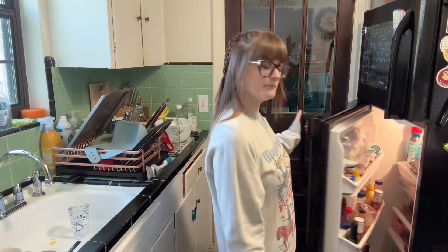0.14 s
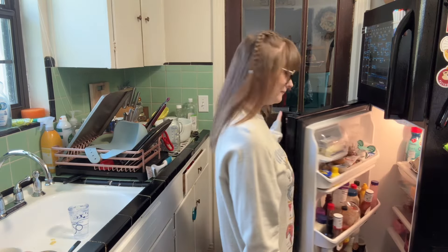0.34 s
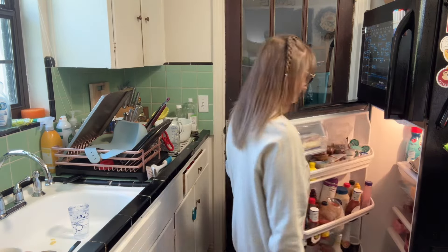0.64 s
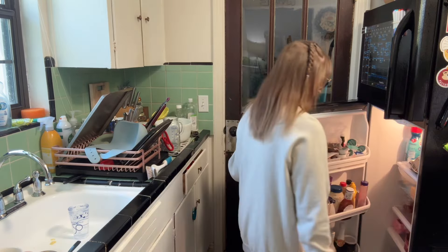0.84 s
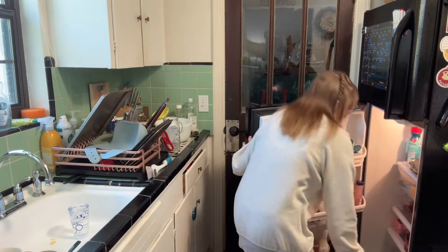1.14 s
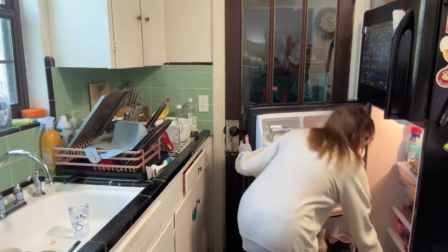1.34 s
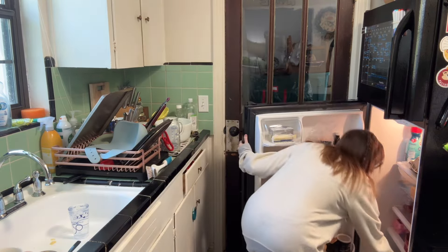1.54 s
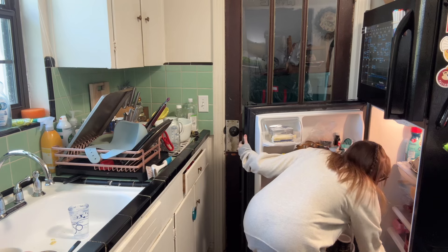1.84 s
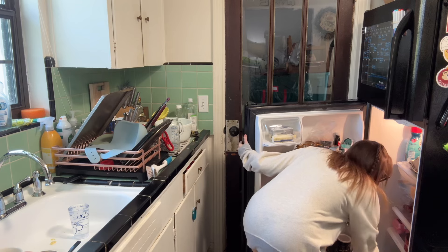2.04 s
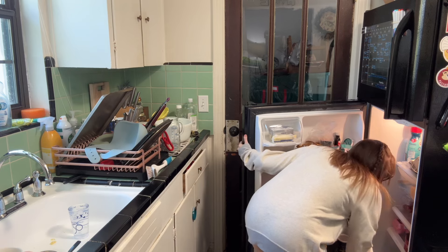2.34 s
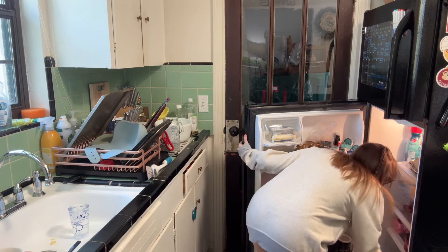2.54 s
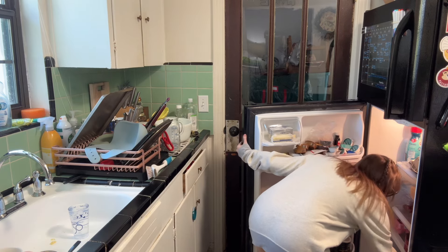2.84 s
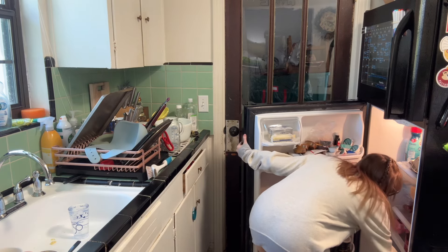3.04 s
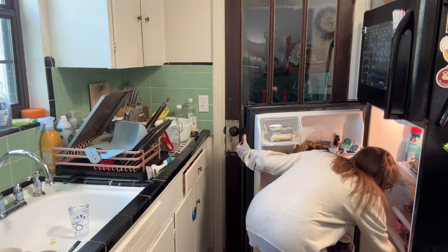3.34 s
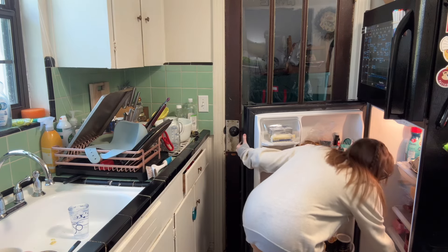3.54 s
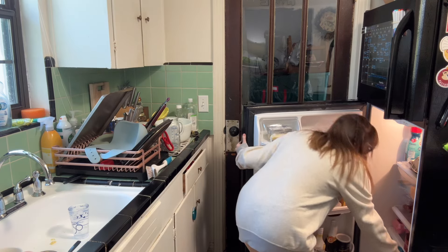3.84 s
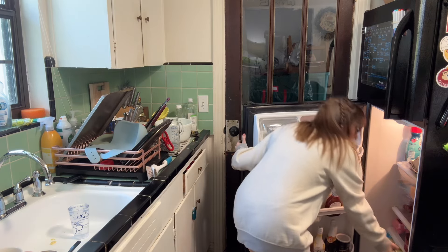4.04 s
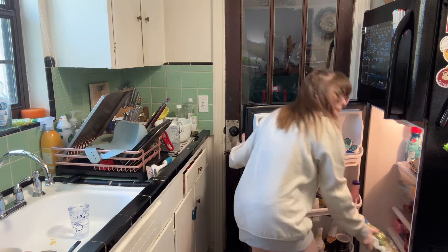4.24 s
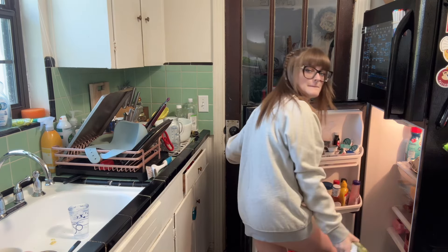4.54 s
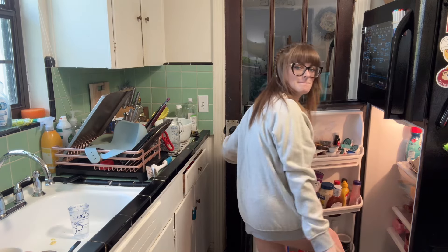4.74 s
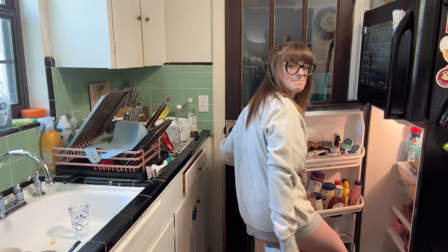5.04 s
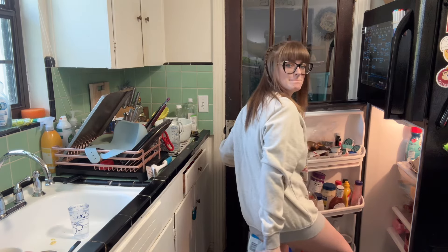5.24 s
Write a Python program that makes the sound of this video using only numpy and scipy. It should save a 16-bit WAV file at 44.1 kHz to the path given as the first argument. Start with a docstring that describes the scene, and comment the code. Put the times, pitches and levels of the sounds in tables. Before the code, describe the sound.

A refrigerator is heard from across a small kitchen, over a low rumble and a faint appliance whine. In the first 0.6 seconds bottles clink lightly as the door swings, and at about 0.75 seconds the door rack clacks and rattles. Sleeves brush softly. From 1.5 to 1.8 seconds hard plastic containers knock loudly on the shelves, with low thumps from the cabinet walls. A drawer slides out around 1.9 to 2.4 seconds, with further knocks. A thin plastic bag starts rustling with it and crinkles most from 2.8 to 4 seconds, while a container is dragged and a sharp knock lands at 3.5 seconds. After a quieter moment of cloth brushing, the drawer rumbles back in from about 4.9 seconds to the end, with a few softer knocks.

```python
"""A refrigerator in a small kitchen, heard across the room over low rumble and a faint whine.
The door swings: bottles clink in its rack, sleeves brush, and the rack clacks as the door stops.
Plastic containers knock on the shelves and set them ringing; soft bumps thump the cabinet walls.
A drawer sticks and slips out on its runners, a bag buckles and crinkles, a container is dragged.
Last, the drawer is pushed back with a few more knocks."""
import sys
import numpy as np
from scipy import signal
from scipy.fft import rfft, irfft, next_fast_len
from scipy.io import wavfile

SR = 44100
rng = np.random.default_rng(int(sys.argv[2]) if len(sys.argv) > 2 else 0)


def wav_record(signal):
    """Record a signal, one row per channel, as 16-bit PCM in the file named by sys.argv[1]."""
    frames = np.transpose(np.atleast_2d(signal))
    bounded = np.clip(frames, -1, 1)
    # unit amplitude maps onto the largest positive 16-bit level
    quanta = np.round(bounded * 32767).astype(np.int16)
    wavfile.write(sys.argv[1], SR, quanta)


N = 238253
TIME_S = np.arange(N) / SR
BAND_EDGES_HZ = np.geomspace(18, 18000, 21)

# room noise (frequency [Hz], density [dB])
AIR_SPECTRUM = [(12, -27), (20, 6), (40, -1.5), (91, -18.5), (120, -14), (216, -15.5), (255, -19),
                (293, -22), (527, -18.5), (976, -25.5), (2200, -35), (2460, -35.5), (16000, -54.5)]
# appliance whine (frequency [Hz], level [dB])
WHINE_TONES = [(673, -70), (1168, -71.5)]

# bottle contacts (time [s], clink [dB], treble [dB])
CLINKS = [(0.183, -46.5, -51), (0.355, -43, -47), (0.572, -54.5, -75), (1.421, -46.5, -57.5)]
# bottle resonances (frequency [Hz], gain [dB], T60 [s])
BOTTLE_MODES = [(560, -2, 0.23), (756, -9.5, 0.32), (1190, -22, 0.16), (1600, -3.5, .1), (1690, -12, 0.16),
                (2460, -11.5, 0.24), (2460, -15.5, 0.39), (2830, -27, 0.11), (3480, -13, 0.13),
                (7440, -12, 0.18), (7800, -1.5, .15), (8080, -13, .12), (8040, -2, .15), (8740, -12, .08),
                (9530, 3.5, .06), (10460, -2.5, 0.067)]
# glass chatter between the modes (frequency [Hz], gain [dB])
GLASS_SPECTRUM = [(60, -40), (400, -17), (900, -12.5), (2000, -4), (3500, -8), (5200, -23.5), (8000, 3),
                  (10000, -18), (13000, -30)]

# sleeve brushes (time [s], hold [s], level [dB])
BRUSHES = [(.29, 0.022, -61.5), (.94, 0.133, -62), (1.195, 0.012, -43.5), (1.36, 0.17, -61.5),
           (1.64, 0.0052, -51), (4.02, 0.34, -58), (4.18, 0.024, -62), (4.36, 0.27, -64.5),
           (4.61, 0.018, -53.5)]
# cloth hiss (frequency [Hz], density [dB])
SLEEVE_SPECTRUM = [(100, -8), (700, -6.5), (2000, -3), (6000, -3.5), (9000, -6), (15000, -17)]

# door stop and rebound (time [s], clack [dB], treble [dB])
DOOR_STOPS = [(.7428, -20, -34.5), (.753, -24, -34)]
# rack resonances (frequency [Hz], gain [dB], T60 [s])
RACK_MODES = [(790, -13, 0.19), (1106, -10, 0.11), (1285, -5.5, 0.058), (1596, -17, 0.16),
              (1820, -13, 0.18), (2127, -4.5, 0.073), (2630, -10.5, 0.12), (2865, -9, 0.057),
              (3950, -12.5, 0.091)]
# rack rattle between the modes (frequency [Hz], gain [dB])
RACK_SPECTRUM = [(60, -54), (450, -20), (900, -27), (2000, -7), (5000, -16.5), (8500, 1), (14000, -21)]

# single creases snapping (time [s], strength [dB], sharpness [dB])
CREASES = [(1.0201, -44.5, 1), (2.145, -18, -3), (2.697, -23, 12), (2.826, -22, 12), (2.867, -19, 5),
           (2.9436, -10.5, -5.5), (3.022, -18, 8), (3.0684, -24.5, 15), (3.1089, -11.5, -8),
           (3.1543, -14.5, 2.5), (3.1875, -22.5, 2), (3.2293, -22, -0.5), (3.242, -17, -8),
           (3.309, -16.5, -5), (3.4307, -17.5, 5), (3.594, -21, 0), (3.66, -29, 17), (3.8419, -16, -0.5),
           (3.918, -20, -1), (4.0084, -27, 2), (4.034, -28.5, 8), (4.2853, -33, -0.5), (4.5313, -34.5, -14),
           (4.582, -31, -16), (4.6076, -30, -16)]
# crease snap (frequency [Hz], gain [dB])
CREASE_SPECTRUM = [(100, -34.5), (400, -12.5), (1000, -12), (2200, -8.5), (4000, -16), (8000, -9),
                   (11000, -16), (15000, -22.5)]
# bag dragged out, then lifted free; a list per move (time [s], level [dB])
BAG_MOVES = [
    [(1.92, -43), (2.284, -44), (2.442, -48), (2.57, -54.5)],
    [(2.76, -35.5), (2.832, -35), (2.99, -35), (3.328, -32), (3.442, -35), (3.5, -30), (3.64, -42)],
]
# bag squeezes (time [s], hold [s], level [dB])
SQUEEZES = [(1.89, 0.066, -46), (2.08, 0.012, -39), (2.15, 0.013, -32.5), (2.245, 0.0091, -37),
            (2.79, .02, -36.5), (3.29, 0.011, -36), (3.37, 0.032, -29), (3.829, 0.006, -40),
            (3.935, .008, -47)]
# bag crinkle (frequency [Hz], density [dB])
BAG_SPECTRUM = [(71, -33), (120, -17.5), (204, 0.5), (321, -4), (378, -19), (684, 4.5), (839, -7.5),
                (911, 3.5), (1210, -13), (1320, -5.5), (2430, -8), (8480, -5.5), (16000, -20.5)]

# container knocks (time [s], strength [dB], contact [ms], cabinet thud [dB], hollow drawer [dB])
KNOCKS = [(1.547, -25.5, 0.33, -17, -34), (1.7, -23.5, 0.083, -24, -31.5), (1.7391, -11, 0.042, -18, -15),
          (1.7584, -9.5, 0.091, -14.5, -14), (1.8255, -26, 0.28, -35, -18),
          (2.3482, -16.5, 0.22, -24, -19.5), (2.3652, -19, 0.078, -31, -25.5),
          (2.3948, -26.5, 2.8, -27, -27), (2.6405, -26, 0.26, -33, -19.5), (3.482, -9, 0.1, -18, -11.5),
          (3.7387, -34, 0.72, -40.5, -28), (3.845, -39.5, 0.77, -41.5, -31.5),
          (4.8571, -27.5, 0.73, -41, -27.5), (4.9257, -24, 0.53, -33, -21), (5.1594, -32, 0.38, -42, -23),
          (5.1855, -49, .9, -38, -30)]
# cabinet, drawer and shelf resonances (frequency [Hz], gain [dB], T60 [s])
SHELF_MODES = [(82.9, -2.5, 0.32), (105.6, 7.5, 0.098), (117, -2, 0.3), (181.3, -15.5, 0.65),
               (210.2, -3, 0.33), (287.4, 0.5, 0.085), (340.6, -13.5, 0.16), (396, -20, 0.11),
               (424.2, -11, 0.21), (496.3, -12.5, 0.13), (536, -17.5, 0.67), (638, -11, 0.21),
               (676.5, -13.5, 0.15), (804, -12.5, 0.12), (900, -9, 0.15), (1085, -17.5, 0.29),
               (1303, -15, 0.16), (1554, -18, 0.064), (1891, -12.5, 0.1), (2320, -18.5, 0.058),
               (2696, -20, 0.096), (3530, -16, 0.15), (3840, -19.5, 0.17), (4520, -31, 0.05),
               (6160, -9.5, 0.088), (9300, -24.5, 0.057)]
# their dense finer modes (frequency [Hz], gain [dB])
PLASTIC_SPECTRUM = [(40, -27.5), (80, -28.5), (160, -28), (250, -4.5), (420, -14.5), (800, -4.5),
                    (2000, -10.5), (5000, -4), (8000, 2), (11000, -6), (15000, -8.5)]
# decay of the finer modes (frequency [Hz], T60 [s])
PLASTIC_T60 = [(80, 0.17), (400, 0.27), (1500, 0.15), (5000, 0.068), (14000, 0.041)]

# soft bumps on the cabinet wall (time [s], level [dB])
BUMPS = [(1.55, -11.5), (1.787, -14), (1.829, -21.5), (4.637, -34), (4.665, -38), (4.934, -28.5),
         (5.191, -29.5)]
# insulated wall resonances (frequency [Hz], gain [dB], T60 [s])
WALL_MODES = [(72, -6, 0.26), (129, -1.5, .11), (165, -1.5, .1)]

# drawer pulled out (time [s], rumble [dB], hiss [dB])
DRAWER_PULL = [(1.92, -46, -37), (2.032, -36, -43), (2.17, -35.5, -36), (2.33, -38, -49)]
# drawer pushed back (time [s], rumble [dB], hiss [dB])
DRAWER_PUSH = [(4.855, -34, -66), (4.937, -28, -52.5), (5.115, -41, -45), (5.149, -37, -38.5),
               (5.187, -27, -45.5), (5.219, -30.5, -47.5), (5.38, -33.5, -48)]
# runner resonances (frequency [Hz], width [Hz], gain [dB])
RUNNER_MODES = [(79.6, 14, 3), (134, 18, -6), (286, 90, -10), (506, 140, -16), (745, 130, -15.5),
                (1250, 22, -13.5)]
# runner hiss (frequency [Hz], density [dB])
RUNNER_SPECTRUM = [(290, -39), (500, -5), (698, 3), (761, -13.5), (1080, -1.5), (1930, -8.5), (4150, -4.5),
                   (9220, -17), (16000, -33)]

# container dragged over the drawer floor (time [s], level [dB])
DRAG = [(2.78, -33), (3.436, -35), (3.66, -43.5), (4.02, -51)]
# its resonances (frequency [Hz], width [Hz], gain [dB])
DRAG_MODES = [(100, 58, 1), (198, 38, 3), (283, 83, -2), (615, 65, -11.5), (880, 77, -5)]

# room decay (frequency [Hz], T60 [s])
KITCHEN_T60 = [(80, 0.7), (500, 0.28), (2500, 0.29), (8000, 0.29), (15000, 0.26)]

SLIDE_RISE_S, SLIDE_FALL_S = 0.044, 0.091   # per 20 dB


def from_db(db):
    """Decibels to gain."""
    return 10 ** (np.asarray(db) / 20)


def unit_rms(x):
    """Scale to unit rms."""
    return x / np.sqrt(np.mean(x ** 2) + 1e-20)


def at_hz(points, hz):
    """Interpolate (frequency [Hz], value) points over log frequency."""
    freqs_hz, values = np.transpose(points)
    return np.interp(np.log(hz), np.log(freqs_hz), values)


def butter(x, edges_hz, kind):
    """Butterworth filter, 12 dB per octave."""
    return signal.sosfilt(signal.butter(2, edges_hz, kind, fs=SR, output="sos"), x)


def drift(rate_hz):
    """Random wander through unit-variance knots."""
    knots = rng.standard_normal(4000)
    return np.interp(TIME_S * rate_hz, np.arange(len(knots)), knots)


def noise_bands(size):
    """Unit-rms half-octave noise bands: (centre [Hz], samples)."""
    white = rng.standard_normal((2, size + SR // 4))
    for k, (low_hz, high_hz) in enumerate(zip(BAND_EDGES_HZ, BAND_EDGES_HZ[1:])):
        band = butter(white[k % 2], [low_hz, high_hz], "band")
        yield np.sqrt(low_hz * high_hz), unit_rms(band[-size:])


def coloured(x, spectrum):
    """Apply a spectrum; unit rms."""
    size = next_fast_len(N)
    hz = np.maximum(np.fft.rfftfreq(size, 1 / SR), 1)
    shaped = rfft(x, size) * from_db(at_hz(spectrum, hz))
    return unit_rms(irfft(shaped, size)[:N])


def blows(times_s, levels_db):
    """One click per contact."""
    clicks = np.zeros(N)
    clicks[np.round(np.asarray(times_s) * SR).astype(int)] = from_db(levels_db)
    return clicks


def force_db(force, hz):
    """Each blow's level at one frequency; force is (frequency [Hz], level per blow [dB])."""
    anchors_hz, levels_db = zip(*force)
    return np.array([np.interp(np.log(hz), np.log(anchors_hz), row) for row in np.transpose(levels_db)])


def ring(clicks, hz, t60_s):
    """One damped mode: a unit click starts a unit sine, no DC."""
    radius, angle = from_db(-60 / (t60_s * SR)), 2 * np.pi * hz / SR
    return signal.lfilter([.5, 0, -.5], [1, -2 * radius * np.cos(angle), radius ** 2], clicks + 1e-18)


def modal(times_s, force, modes, scatter_db):
    """Clear modes swell over about a cycle; scatter mimics a varying strike point."""
    scatter = rng.standard_normal((len(times_s), len(modes)))
    out = 0
    for k, (hz, db, t60_s) in enumerate(modes):
        clicks = blows(times_s, force_db(force, hz) + db + scatter_db * scatter[:, k])
        swell = signal.iirpeak(hz, Q=3.6, fs=SR)
        out = out - signal.lfilter(*swell, ring(clicks, hz, t60_s))
    return out


def clatter(times_s, force, spectrum, t60s, rise_s, scatter_db=2.87):
    """Dense modes as noise bands, charged unevenly by each blow; t60s is (frequency [Hz], T60 [s])."""
    scatter = rng.standard_normal((len(times_s), len(BAND_EDGES_HZ)))
    rise_pole = np.exp(-1 / (rise_s * SR))
    out = 0
    for k, (hz, band) in enumerate(noise_bands(N)):
        levels_db = force_db(force, hz) + at_hz(spectrum, hz) + scatter_db * scatter[:, k]
        energy_pole = from_db(-120 / (at_hz(t60s, hz) * SR))
        energy = signal.lfilter([1], [1, -energy_pole], blows(times_s, levels_db) ** 2 + 1e-18)
        out = out + band * signal.lfilter([1 - rise_pole], [1, -rise_pole], np.sqrt(energy))
    return out


def tick(times_s, levels_db, band_hz):
    """Sharp onset of each contact."""
    return butter(blows(times_s, levels_db), band_hz, "band")


def grains(per_s, spread_db):
    """Random tiny slips: most weak, a few strong."""
    sizes = from_db(spread_db * np.minimum(rng.exponential(1, N), 4))
    signs = rng.choice([-1, 1], N)
    return sizes * signs * (rng.random(N) < per_s / SR)


def stroke(times_s, levels_db, rise_s, fall_s):
    """Gain of one movement; rise and fall times are per 20 dB."""
    before = np.maximum(times_s[0] - TIME_S, 0) / rise_s
    after = np.maximum(TIME_S - times_s[-1], 0) / fall_s
    return from_db(np.interp(TIME_S, times_s, levels_db) - 20 * np.minimum(before + after, 10))


def rubs(rows):
    """Gain of brief rubs that swell and fade alike."""
    return sum(stroke([start_s, start_s + hold_s], [db, db], rise_s=0.015, fall_s=0.088)
               for start_s, hold_s, db in rows)


def stick_slip(modes, slips_per_s, spread_db, catch_db):
    """Friction catches and lets go, shaking a body's resonances; unit rms."""
    slips = grains(slips_per_s, spread_db)
    body = sum(from_db(db) * signal.lfilter(*signal.iirpeak(hz, hz / width_hz, fs=SR), slips)
               for hz, width_hz, db in modes)
    catching = from_db(catch_db * drift(rate_hz=35))
    return unit_rms(butter(body * catching, edges_hz=29, kind="high"))


def room_tone():
    """Low rumble, faint hiss and a wavering appliance whine."""
    whine = sum(from_db(db) * np.sqrt(2) * np.sin(2 * np.pi * hz * TIME_S) for hz, db in WHINE_TONES)
    waver = from_db(2.5 * drift(rate_hz=5))
    return from_db(-47.5) * coloured(rng.standard_normal(N), AIR_SPECTRUM) + whine * waver


def bottles():
    """Glass strikes glass as the door swings."""
    times_s, clink_db, treble_db = np.transpose(CLINKS)
    force = [(4500, clink_db), (7500, treble_db)]
    chatter = clatter(times_s, force, GLASS_SPECTRUM, [(1000, 0.17), (9000, 0.041)], rise_s=0.00028)
    ringing = modal(times_s, force, BOTTLE_MODES, scatter_db=1.5)
    contact = tick(times_s, clink_db, band_hz=(1183, 8050))
    return from_db(-4.5) * ringing + from_db(1.5) * chatter + contact


def sleeves():
    """Cloth rubs on door and body: a soft, fine-grained hiss."""
    slips = grains(per_s=15000, spread_db=2.5) * from_db(2.6 * drift(rate_hz=60))
    return rubs(BRUSHES) * coloured(slips, SLEEVE_SPECTRUM)


def door():
    """The loaded plastic rack clacks as the door stops; its bottles jostle on."""
    times_s, clack_db, treble_db = np.transpose(DOOR_STOPS)
    force = [(4500, clack_db), (7500, treble_db)]
    clack = clatter(times_s, force, RACK_SPECTRUM, [(1000, 0.076), (9000, 0.067)], rise_s=0.0009)
    jostle_t60s = [(1000, 0.2), (2500, 0.18), (9000, 0.079)]
    jostle = clatter(times_s, force, RACK_SPECTRUM, jostle_t60s, rise_s=0.016)
    jostle *= from_db(1.9 * drift(rate_hz=140))
    ringing = modal(times_s, force, RACK_MODES, scatter_db=0)
    return from_db(-3) * (ringing + clack) + from_db(-18) * jostle


def bag_creases():
    """Single creases snap: strong ones sharp, weak ones papery."""
    times_s, snap_db, sharp_db = np.transpose(CREASES)
    bright_db = 3.9 + 1.244 * snap_db + 0.35 * sharp_db
    top_db = 20 + 2.08 * snap_db + sharp_db
    force = [(1800, snap_db - 9.5), (3500, snap_db), (8000, bright_db), (12500, top_db)]
    snaps = clatter(times_s, force, CREASE_SPECTRUM, [(500, 0.046), (9000, 0.053)], rise_s=0.00056)
    return from_db(-1) * snaps + tick(times_s, top_db - 14, band_hz=(2500, 14000))


def knock_forces():
    """Each knock and its softer rebound; longer contact drives less treble."""
    rebound_offset = [0.029, -6, 0.82, -12, -6]   # columns as in KNOCKS
    first = np.array(KNOCKS)
    times_s, strength_db, contact_ms, thud_db, hollow_db = np.vstack([first, first + rebound_offset]).T
    body = [(215, thud_db), (275, hollow_db), (380, hollow_db), (560, strength_db), (1100, strength_db)]
    hard_db = strength_db + 6.5   # treble of a perfectly hard contact
    treble = [(hz, hard_db - 20 * np.log10(1 + (hz * contact_ms / 1000) ** 2))
              for hz in (2600, 8000, 14000)]
    return times_s, body + treble


def containers():
    """Hard plastic strikes the shelves: bright crack over the hollow cabinet."""
    times_s, force = knock_forces()
    fine_modes = clatter(times_s, force, PLASTIC_SPECTRUM, PLASTIC_T60, rise_s=0.0037)
    contact = tick(times_s, force_db(force, hz=2610) + 7.5, band_hz=(600, 8900))
    buzz = from_db(0.77 * drift(rate_hz=330))   # loose walls chatter
    ringing = modal(times_s, force, SHELF_MODES, scatter_db=2)
    body = from_db(-1) * ringing + from_db(-0.5) * fine_modes * buzz
    return butter(body, edges_hz=25, kind="high") + contact


def cabinet():
    """Soft bumps drive only the walls' lowest, well-damped modes."""
    pushes = blows(*np.transpose(BUMPS))
    thump = sum(from_db(db) * ring(pushes, hz, t60_s) for hz, db, t60_s in WALL_MODES)
    return butter(thump, edges_hz=235, kind="low")


def bag_crinkle():
    """Thin plastic, moved and squeezed, buckles in clumps of tiny snaps."""
    moves = sum(stroke(*np.transpose(move), rise_s=0.093, fall_s=0.19) for move in BAG_MOVES)
    handling = np.hypot(from_db(1) * moves, rubs(SQUEEZES))
    clumps = grains(per_s=5200, spread_db=3.5) * from_db(3.3 * drift(rate_hz=110))
    pops = grains(per_s=160, spread_db=2.5)
    return handling * (coloured(clumps, BAG_SPECTRUM) + from_db(-10) * coloured(pops, BAG_SPECTRUM))


def drawer():
    """The drawer rumbles and hisses on its runners, out and back."""
    rumble_gain = hiss_gain = 0
    for slide, hiss_trim_db in ((DRAWER_PULL, -0.8), (DRAWER_PUSH, 6)):
        times_s, rumble_db, hiss_db = np.transpose(slide)
        rumble_gain += stroke(times_s, rumble_db - 1.5, SLIDE_RISE_S, SLIDE_FALL_S)
        hiss_gain += stroke(times_s, hiss_db + hiss_trim_db, SLIDE_RISE_S, SLIDE_FALL_S)
    hiss = coloured(grains(per_s=13000, spread_db=3), RUNNER_SPECTRUM)
    rumble = stick_slip(RUNNER_MODES, slips_per_s=1500, spread_db=2, catch_db=2)
    return rumble_gain * rumble + hiss_gain * hiss


def dragged_container():
    """A container judders across the drawer floor."""
    pull = from_db(-7) * stroke(*np.transpose(DRAG), SLIDE_RISE_S, SLIDE_FALL_S)
    return pull * stick_slip(DRAG_MODES, slips_per_s=900, spread_db=3, catch_db=1.5)


def kitchen(x, wet_db, first_wall_s):
    """Tile and cupboards add a dense tail after the first reflection; bass lasts longest."""
    age_s = TIME_S[:SR * 3 // 4]
    tail = sum(np.sqrt(hz) * band * from_db(-60 * age_s / at_hz(KITCHEN_T60, hz))
               for hz, band in noise_bands(len(age_s)))
    tail *= np.clip(age_s / first_wall_s - 1, 0, 1)
    return x + from_db(wet_db) * signal.fftconvolve(x, tail / np.linalg.norm(tail))[:N]


def scene():
    """Mono mix: the door rack out in the room, the drier handling from the cabinet's mouth."""
    rack = kitchen(bottles() + door(), wet_db=-6, first_wall_s=0.0052)
    handling = containers() + cabinet() + bag_crinkle() + bag_creases()
    handling += sleeves() + drawer() + dragged_container()
    inside = kitchen(handling, wet_db=-11.5, first_wall_s=0.0012)
    return (rack + inside + room_tone())[None]


def record(dry):
    """Clip at full scale, then low-pass steeply."""
    cutoff_hz = 15900
    top_cut = signal.ellip(10, .1, 80, cutoff_hz, fs=SR, output="sos")
    return signal.sosfilt(top_cut, np.clip(dry, -1, 1))


dry = scene()
out = record(dry)
wav_record(out)
```